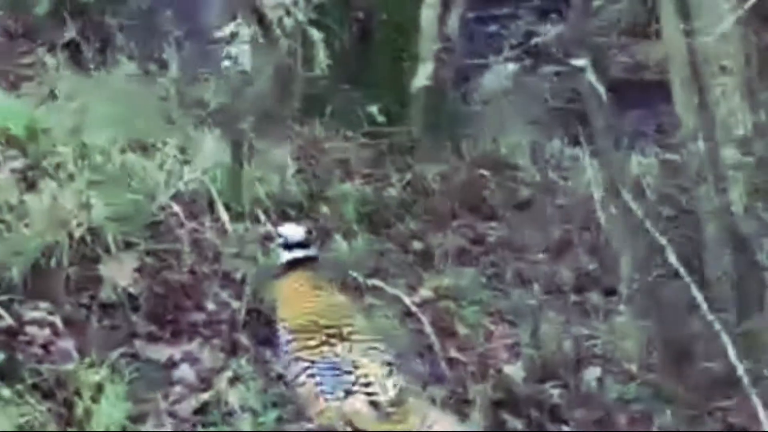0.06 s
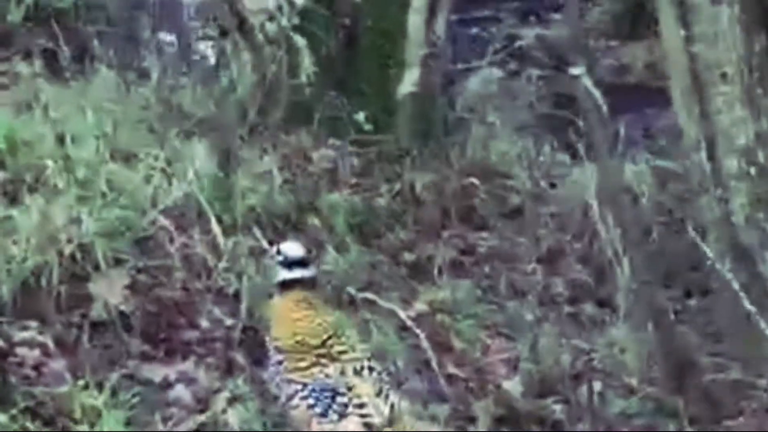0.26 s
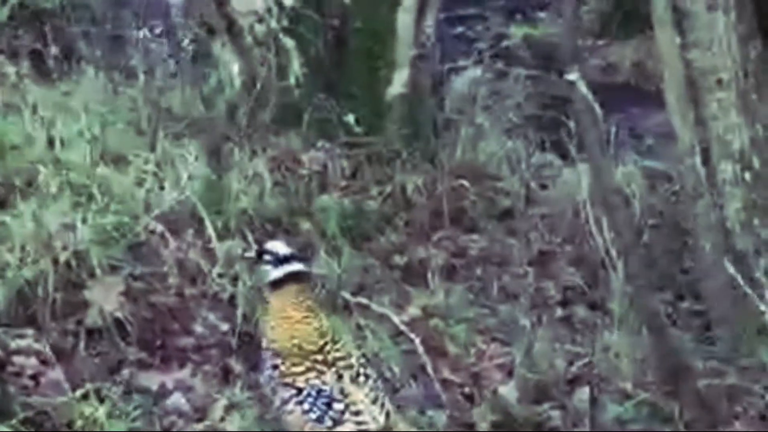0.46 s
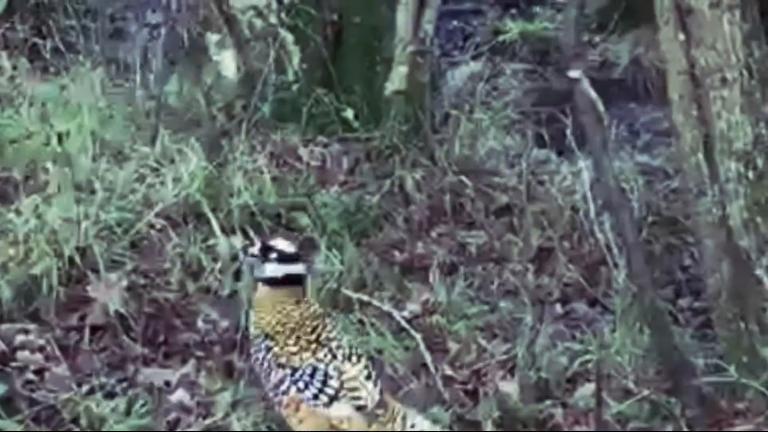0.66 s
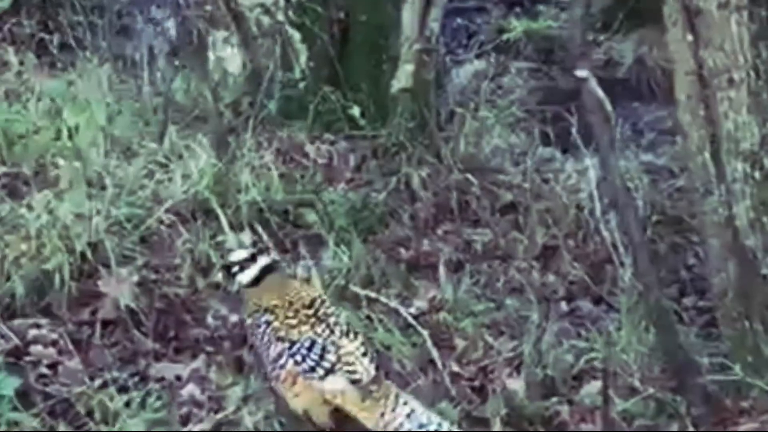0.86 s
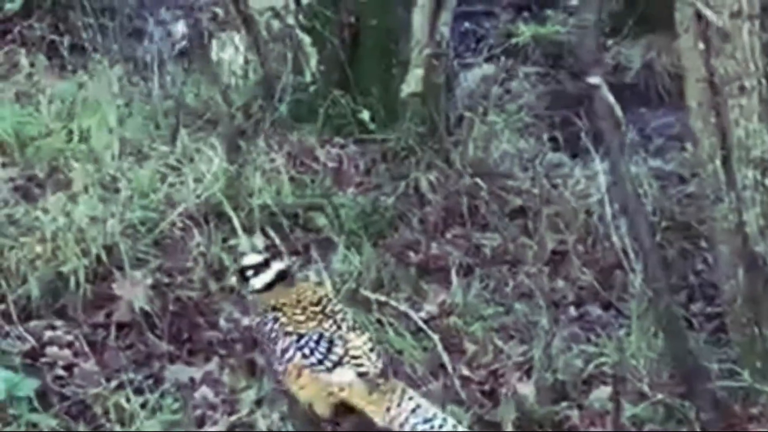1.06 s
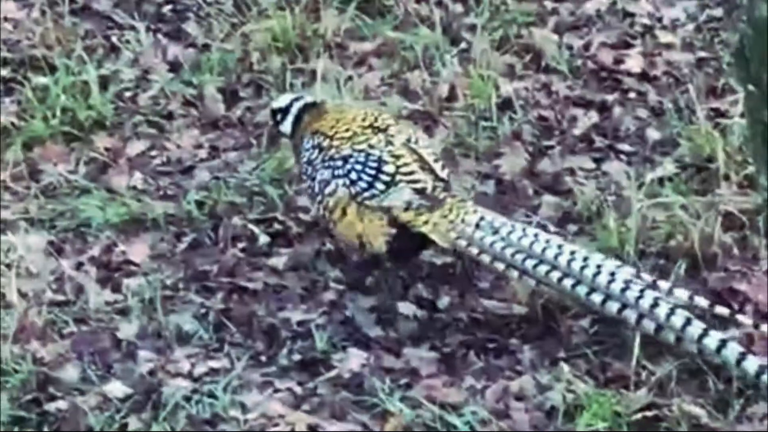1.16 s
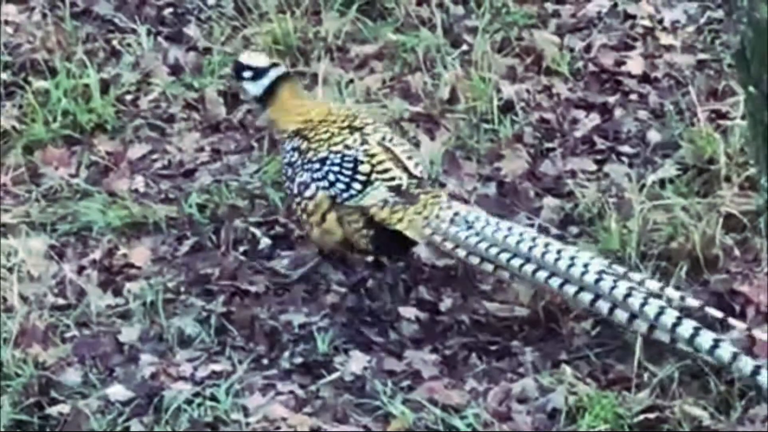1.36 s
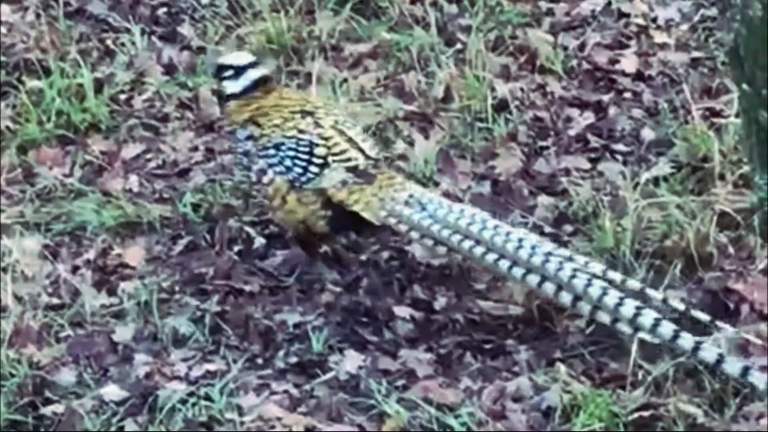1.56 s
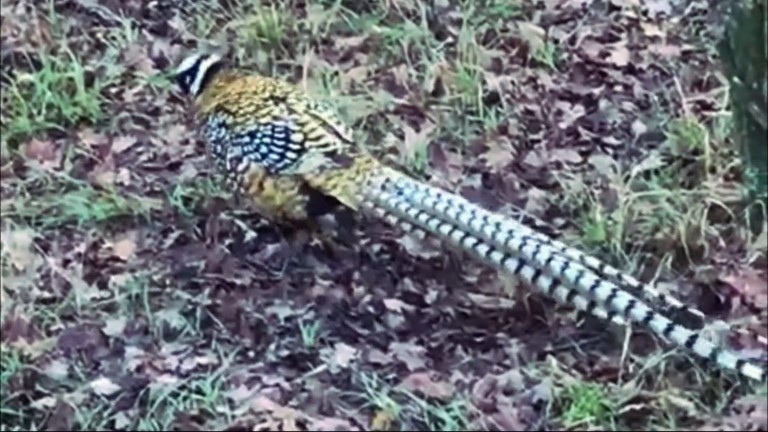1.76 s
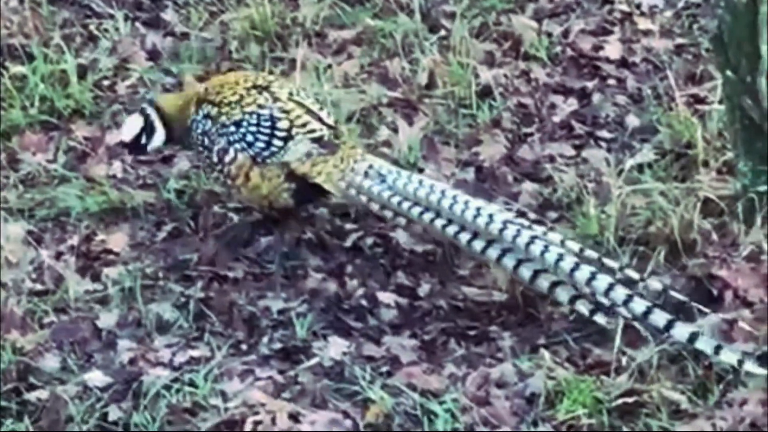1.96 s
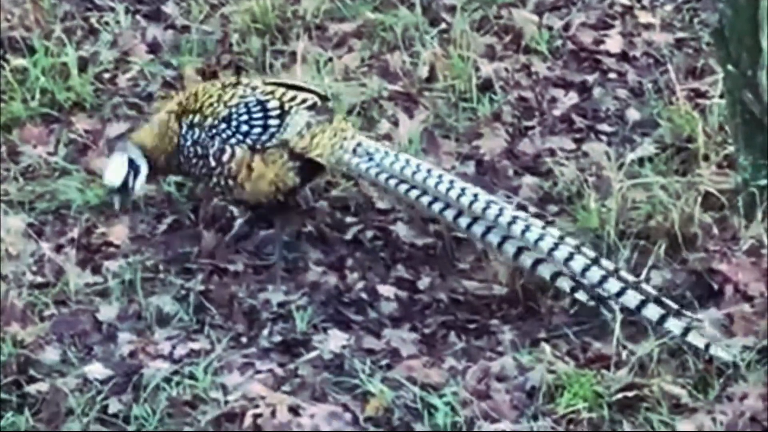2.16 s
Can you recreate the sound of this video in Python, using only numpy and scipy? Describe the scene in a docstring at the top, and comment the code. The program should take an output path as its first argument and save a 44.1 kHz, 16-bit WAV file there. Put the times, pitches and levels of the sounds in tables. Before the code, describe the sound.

A pheasant gives short clucks, peeps and thin whistles, echoing lightly among trees. Wind and dull bumps shake the microphone at first, then ease after a click, leaving quicker peeps, raspy chirps and clucks over a soft hush.

```python
"""A pheasant twitters over a low rumble as it forages in damp woodland. Its quick peeps, raspy chirps and
soft clucks are whistles that flick up from a resting pitch and back, coloured by the throat and echoed
by the trees; two thin whistles linger. Wind, rubbing and bumps shake the microphone, leaves tick and the
air rustles. Halfway through, the scene cuts with a click to a calmer spot nearer the bird."""
import sys
import numpy as np
from scipy import signal
from scipy.fft import rfft, irfft, next_fast_len
from scipy.io import wavfile
from scipy.ndimage import uniform_filter1d, map_coordinates

SR = 44100
rng = np.random.default_rng(int(sys.argv[2]) if len(sys.argv) > 2 else 0)


def digitize_waveform(pressure):
    """Quantize a signal to 16-bit integers and store it at the path in sys.argv[1].

    Rows of a 2-D input are taken as channels; values are limited to [-1, 1].
    """
    field = np.atleast_2d(pressure).T
    bounded = np.clip(field, -1, 1)
    quanta = np.round(bounded * 32767).astype(np.int16)
    wavfile.write(sys.argv[1], SR, quanta)


N = 97020
CUT_S = 1.098  # when we move nearer the bird
FAR_ECHO_DB, NEAR_ECHO_DB = -3.5, -5

# The bird's notes. Columns: middle_s, half_length_s, top_pitch_hz, level_db
HIGH_PEEPS = [(.102, 0.012, 3342, -47.5), (1.086, 0.017, 4990, -44), (1.154, .011, 4403, -41),
              (1.373, .012, 4420, -42), (1.574, 0.013, 4510, -43), (1.761, 0.011, 4736, -40.5),
              (1.937, 0.012, 4500, -42.5), (2.119, 0.013, 4243, -41)]
RASPY_CHIRPS = [(1.200, .013, 4370, -41.5), (1.440, 0.016, 5130, -41), (1.636, 0.014, 5045, -40.5),
                (1.794, 0.011, 4977, -37.5), (1.954, .014, 5116, -38.5), (2.145, 0.011, 5567, -38.5)]
LOW_CLUCKS = [(.139, 0.0043, 2000, -41.5), (.167, .012, 2290, -44), (.451, 0.0041, 2120, -40),
              (.465, 0.0059, 1580, -40.5), (0.498, 0.0044, 1900, -40), (.519, .012, 1397, -41.5),
              (.616, 0.02, 923, -48), (.666, 0.0082, 1380, -41), (.753, 0.0047, 2240, -40),
              (.768, 0.0077, 1344, -40), (0.81, 0.008, 1950, -44), (.851, 0.0082, 1536, -41),
              (.897, 0.0083, 1010, -50), (1.072, 0.0036, 2320, -41), (1.194, 0.0079, 1680, -41.5),
              (1.24, 0.0039, 2340, -43.5), (1.274, 0.006, 1600, -41.5), (1.415, 0.0087, 1696, -43.5),
              (1.464, 0.0063, 1056, -46), (1.481, 0.008, 2220, -43), (1.582, 0.0099, 1740, -40),
              (1.617, 0.0065, 1736, -41.5), (1.658, 0.0046, 1090, -46.5), (1.675, 0.0085, 2200, -45.5),
              (1.800, 0.0066, 1530, -42.5), (1.815, 0.0043, 1000, -46.5), (1.832, 0.0081, 2140, -44),
              (1.897, 0.01, 1574, -41.5), (1.977, 0.0071, 1015, -44.5), (1.993, 0.0056, 2175, -40.5),
              (2.158, 0.006, 1620, -44), (2.169, 0.0062, 1100, -44.5), (2.184, 0.0067, 2330, -43)]
# How each kind of note rises and falls. Columns: half_lengths_from_middle, share_of_rise, level_db
PEEP_ARCH = [(-1.904, 0, -14), (-1.2, .1, 1), (-1.2, 0.215, 1), (-.92, 0.374, -31), (-.8, .74, -5),
             (-.4, .9, 5), (0.39, 0.98, -1.5), (0.94, 0.71, -13)]
CHIRP_ARCH = [(-1.6, 0.0069, -7), (-1.15, .14, -9), (-.8, .6, 2.5), (-.4, .86, -2), (0.068, 1, -3.5),
              (.45, .88, -2), (.75, 0.22, -4.5), (0.97, 0.126, 3), (1.174, 0.32, -9)]
CLUCK_ARCH = [(-1.54, 0.014, -25.5), (-1.104, 0.13, 2.5), (-.6, 0.549, 4), (-0.435, 0.96, 2.5),
              (0.41, 0.82, -9.5), (1.22, 0.28, -15)]
def pheasant():
    """One voice makes all three kinds of note, each with its own overtones and hoarseness."""
    peeps = calls(HIGH_PEEPS, PEEP_ARCH, overtone_db=-19, roughness=.22)
    chirps = calls(RASPY_CHIRPS, CHIRP_ARCH, overtone_db=-7, roughness=.5)
    clucks = calls(LOW_CLUCKS, CLUCK_ARCH, overtone_db=-15, roughness=.1)
    return peeps + chirps + clucks


def calls(notes, shape, overtone_db, roughness):
    """Notes echo through the wood; the far ones stop at the cut."""
    far, near = np.zeros((2, N))
    for middle_s, half_s, top_hz, level_db in notes:
        call = amp(level_db) * throat_note(half_s, top_hz, shape, overtone_db, roughness)
        track, echo_db = (far, FAR_ECHO_DB) if middle_s < CUT_S else (near, NEAR_ECHO_DB)
        add(track, middle_s - len(call) / SR / 2, woodland_echo(call, echo_db))
    return far * (clock() < CUT_S) + near


# How the throat and beak boost or soften each pitch. Columns: pitch_hz, gain_db
THROAT_TONE = [(700, 4), (950, 0), (1250, -4), (1700, -6), (2400, -9.5), (3000, -5), (3500, 0.5),
               (4100, -4.5), (4700, -10.5), (5600, -9.5), (6700, 1), (8000, -5.5), (10000, -4.5),
               (11500, -13)]
def throat_note(half_s, top_hz, shape, overtone_db, roughness, rest_hz=953, rough_rate_hz=706.2):
    """One whistle arches up and back with a hoarse edge, centred in a tenth of a second."""
    t = np.arange(SR // 10) / SR
    position = (t - t.mean()) / half_s
    points, rise, level_db = np.transpose(shape)
    pitch_shake, level_shake = [map_coordinates(row, [t * rough_rate_hz], mode="wrap")
                                for row in rng.standard_normal((2, 256))]
    arch = uniform_filter1d(np.interp(position, points, rise), size=70)
    hz = (rest_hz + (top_hz - rest_hz) * arch) * (1 + 0.086 * roughness * pitch_shake)
    phase = 2 * np.pi * np.cumsum(hz) / SR
    sounding = (position > points[0]) * (position < points[-1])
    loudness = uniform_filter1d(amp(np.interp(position, points, level_db)) * sounding, size=50)
    tone = amp(along(THROAT_TONE, hz)) * np.sin(phase)
    for k in range(2, 5):  # overtones swell as the pitch rises
        gain_db = along(THROAT_TONE, k * hz) + overtone_db - 4 * (k - 2)
        tone += arch * amp(gain_db) * np.sin(k * phase) * (k * hz < SR / 2)
    throat_gain = amp(along(THROAT_TONE, np.fft.rfftfreq(len(t), 1 / SR)))
    hiss = unit(irfft(rfft(rng.standard_normal(len(t))) * throat_gain))
    rasp = amp(-5) * roughness * hiss * uniform_filter1d(loudness * arch, size=int(.016 * SR))
    return (tone * loudness + rasp) * (1 + roughness * level_shake)


# The bird's lingering whistles. Columns: start_s, pitch_hz, level_db
THIN_WHISTLES = [(.451, 4195, -47.5), (0.754, 4430, -50.5)]
def thin_whistles(rise_s=0.0032, fade_s=.3, scoop=0.236, waver=.3):
    """Pure tones slide up to their pitch and fade unevenly, heard only before the cut."""
    track, t = np.zeros(N), clock()
    settling = np.exp(-t / rise_s)
    for start_s, pitch_hz, level_db in THIN_WHISTLES:
        phase = 2 * np.pi * np.cumsum(pitch_hz * (1 - scoop * settling)) / SR
        loudness = amp(level_db) * (1 - settling) * fade(t, fade_s) * (1 + waver * wobble(175))
        whistle = loudness * np.sin(phase + 2 * waver * wobble(147))
        add(track, start_s, woodland_echo(whistle, FAR_ECHO_DB))
    return track * (t < CUT_S)


# How long the trees' echo takes to fall by 60 dB. Columns: pitch_hz, fade_s
ECHO_FADE = [(1300, 0.36), (4000, 0.4), (10000, 0.52)]
def woodland_echo(sound, echo_db, ground_db=-5.5, ground_s=0.019):
    """The direct sound, a quick scatter off the ground and a longer echo from the trunks."""
    hz, t, spectrum = signal.stft(rng.standard_normal(SR // 2), SR, nperseg=256)
    trunks = signal.istft(spectrum * fade(t, along(ECHO_FADE, hz)[:, None]), SR, nperseg=256)[1]
    t = np.arange(len(trunks)) / SR
    ground = rng.standard_normal(len(t)) * np.exp(-t / ground_s)
    echo = amp(echo_db) * trunks / np.linalg.norm(trunks)
    echo += amp(ground_db) * ground / np.linalg.norm(ground)
    echo[0] += 1  # the direct sound
    return signal.fftconvolve(sound, echo)


# How gusts and rubbing swell and sink. Columns: time_s, relative_level_db
WIND_LEVELS = [(0, -49.5), (.1, -40), (.15, -51.5), (.25, -39), (.37, -32.5), (.45, -49.5), (.6, -32.5),
               (.8, -32), (.96, -42), (1.0, -29), (1.08, -34.5), (1.11, -43.5), (1.19, -60), (1.33, -53),
               (1.44, -46), (1.68, -60), (1.85, -48.5), (1.93, -58), (2.1, -50.5), (2.2, -64.5)]
RUB_LEVELS = [(0, -47.5), (.16, -61.5), (.34, -48), (.47, -66), (.56, -68), (.62, -45), (.83, -42),
              (.94, -70), (1.01, -37), (1.07, -43), (1.12, -77)]
# Their deep tone. Columns: pitch_hz, gain_db
WIND_TONE = [(20, -52), (35, -7), (50, -0.5), (68, -2), (100, -6), (140, -16), (220, -27.5), (500, -76)]
RUB_TONE = [(70, -32), (130, 8.5), (200, 3), (300, -4.5), (420, -15), (600, -25), (1200, -33.5),
            (3000, -92)]
def wind_and_rubbing():
    """Wind buffets the microphone and handling rubs it."""
    return amp(2.5) * rumble(WIND_LEVELS, WIND_TONE) + amp(1.0) * rumble(RUB_LEVELS, RUB_TONE)


def rumble(levels, colour):
    """Low noise, evened out and then made to follow a level curve."""
    raw = noise(colour)
    even = raw / np.sqrt(np.abs(uniform_filter1d(raw * raw, size=1800)) + 1e-6)
    return even * amp(np.interp(clock(), *np.transpose(levels)))


# Camera bumps, then three wind puffs after the cut. Columns: start_s, thud_db, knock_db
BUMPS_AND_PUFFS = [(0.077, -29.5, -32), (0.231, -28, -32.5), (.269, -12, -28), (.320, -20, -20),
                   (0.373, -27.5, -34), (0.732, -17, -46), (0.844, -17.5, -22), (0.899, -28, -39.5),
                   (.998, -13.5, -25.5), (1.049, -21, -33), (1.422, -30.5, -65), (1.561, -30.5, -87),
                   (1.856, -32.5, -68)]
def bumps_and_puffs(thud_hz=64.4, thud_fade_s=0.12, knock_fade_s=0.094, rise_s=0.0012):
    """A bump is a dull thud with a rough knock; a puff of wind on the microphone is a soft, low thud."""
    thuds, knocks = np.zeros((2, N))
    t = np.arange(SR // 5) / SR
    onset = 1 - np.exp(-t / rise_s)
    for start_s, thud_db, knock_db in BUMPS_AND_PUFFS:
        tone = np.sin(2 * np.pi * thud_hz * rng.lognormal(0, 0.13) * t)
        add(thuds, start_s, amp(thud_db) * onset * fade(t, thud_fade_s) * tone)
        add(knocks, start_s, amp(knock_db) * onset * fade(t, knock_fade_s))
    thuds = filtered(thuds, lambda hz: hz ** 2 / (hz ** 2 + 25 ** 2))  # soften below 25 Hz
    return thuds + knocks * noise(RUB_TONE)


# Four small ticks, then the click at the cut. Columns: start_s, level_db
TICKS_AND_CLICK = [(.737, -38), (.856, -36.5), (0.955, -60), (1.048, -44), (1.096, -39)]
# Their tone. Columns: pitch_hz, gain_db
TICK_TONE = [(400, 5), (4000, -5), (12000, -3.5)]
def ticks_and_click(fade_s=0.0071):
    """Brief bursts of noise: dry leaves and handling tick, then a sharp click comes as the scene cuts."""
    loudness, t = np.zeros(N), np.arange(SR // 10) / SR
    for start_s, level_db in TICKS_AND_CLICK:
        add(loudness, start_s, amp(level_db) * fade(t, fade_s))
    return loudness * noise(TICK_TONE)


# The tone of the woodland air at each spot. Columns: pitch_hz, gain_db
FAR_AIR_TONE = [(400, 2), (900, -0.5), (1600, -5.5), (2600, -11), (5000, -11.5), (9000, -12), (11500, -17)]
NEAR_AIR_TONE = [(400, 8.5), (900, 2.5), (1600, -4.5), (2600, -9.5), (4000, -5), (5500, -10), (9000, -13),
                 (11500, -18)]
def air(flutter_db=.7):
    """A soft rustling hush, brighter before the cut."""
    far = amp(-55) * noise(FAR_AIR_TONE)
    near = amp(-58.5) * noise(NEAR_AIR_TONE)
    return np.where(clock() < CUT_S, far, near) * amp(flutter_db * wobble(40.8))


def amp(db):
    """Turn decibels into a multiplier."""
    return 10 ** (np.asarray(db) / 20)


def fade(t, fade_s):
    """Fall by 60 dB every fade_s seconds."""
    return amp(-60 * t / fade_s)


def unit(x):
    """Scale to an average power of 1."""
    return x / np.sqrt(np.mean(x ** 2) + 1e-20)


def along(points, hz):
    """Read between the rows of a (pitch_hz, value) table, on a scale of octaves."""
    pitches, values = np.transpose(points)
    return np.interp(np.log(hz + 1), np.log(pitches + 1), values)


def clock():
    """The time of each sample in seconds."""
    return np.arange(N) / SR


def wobble(rate):
    """A smooth curve through `rate` random points a second."""
    return map_coordinates(rng.standard_normal(8192), [clock() * rate], mode="wrap")


def filtered(x, gain_at):
    """Turn each frequency up or down by gain_at(hz)."""
    size = next_fast_len(N + 8192)
    return irfft(rfft(x, size) * gain_at(np.fft.rfftfreq(size, 1 / SR)), size)[:N]


def noise(colour):
    """Noise of power 1, shaped by a tone table."""
    return unit(filtered(rng.standard_normal(N), lambda hz: amp(along(colour, hz))))


def add(track, start_s, sound):
    """Mix a sound in from start_s."""
    part = track[max(int(start_s * SR), 0):][:len(sound)]
    part += sound[:len(part)]


def scene():
    """The bird, the low rumble and the wood, in one channel."""
    low = wind_and_rubbing() + bumps_and_puffs()
    return (pheasant() + thin_whistles() + low + ticks_and_click() + air())[None]


def record(dry, top_hz=11900):
    """The camera keeps nothing above top_hz."""
    return filtered(dry[0], lambda hz: hz < top_hz)[None]


dry = scene()
out = record(dry)
digitize_waveform(out)
```